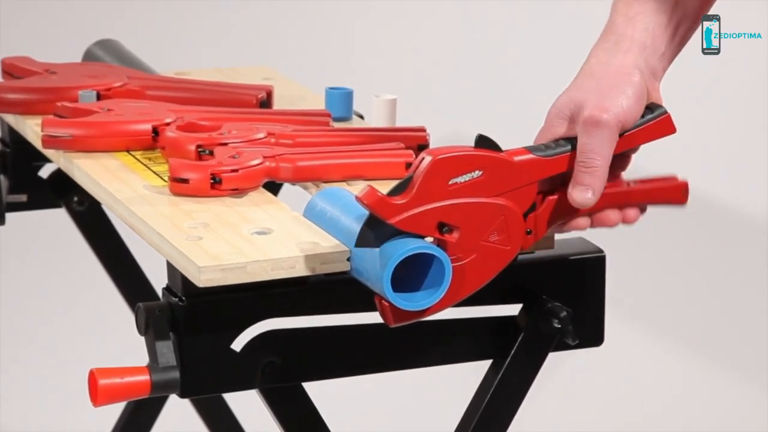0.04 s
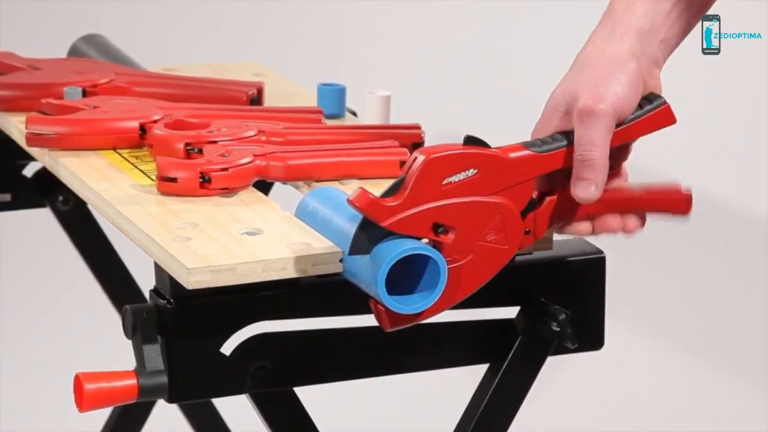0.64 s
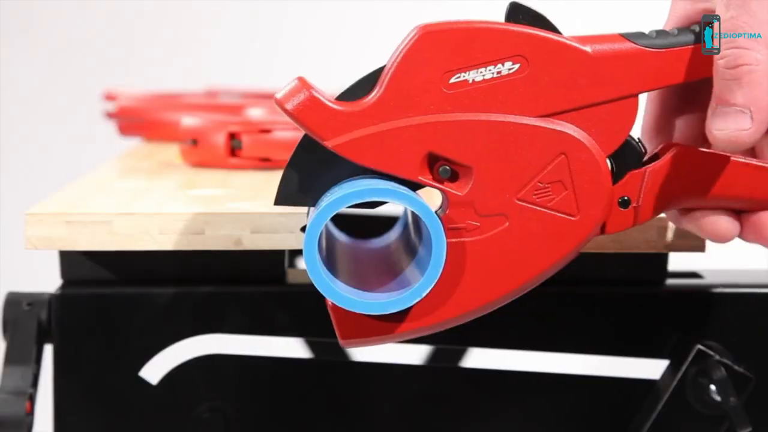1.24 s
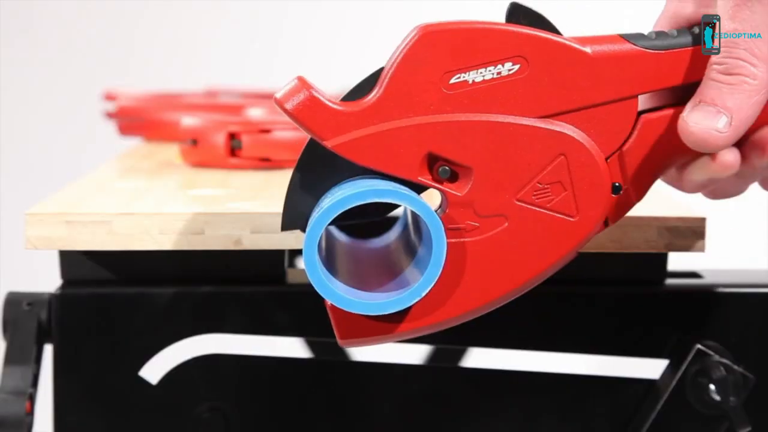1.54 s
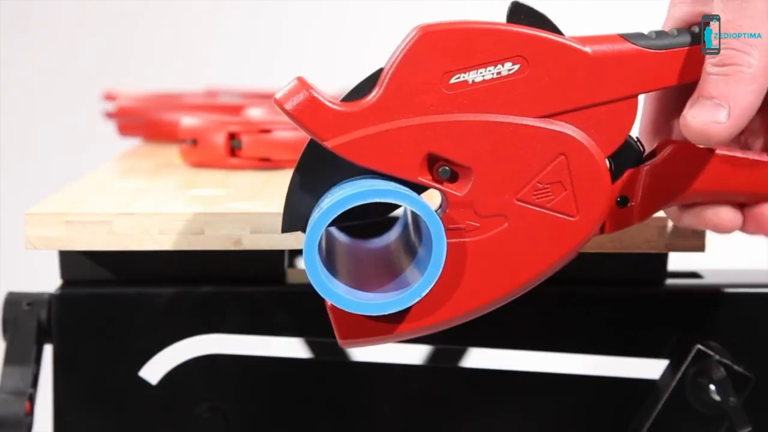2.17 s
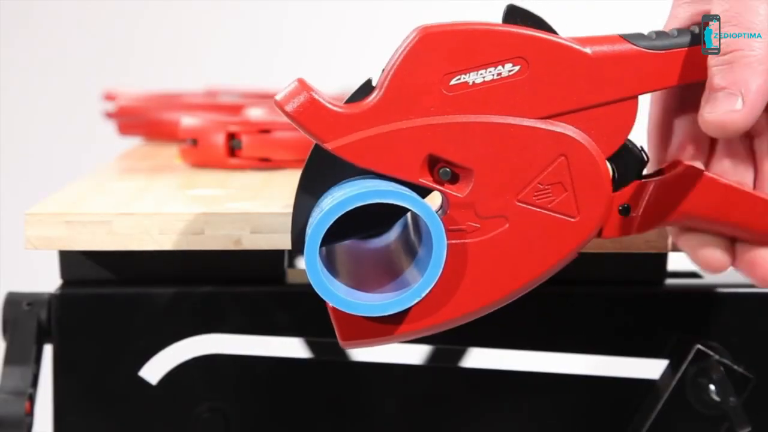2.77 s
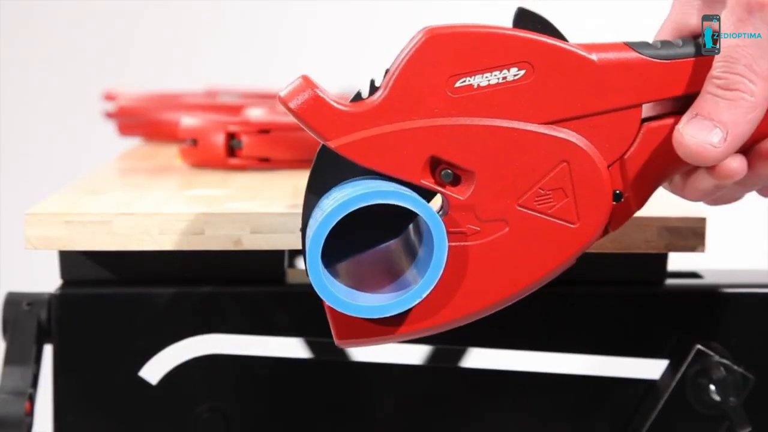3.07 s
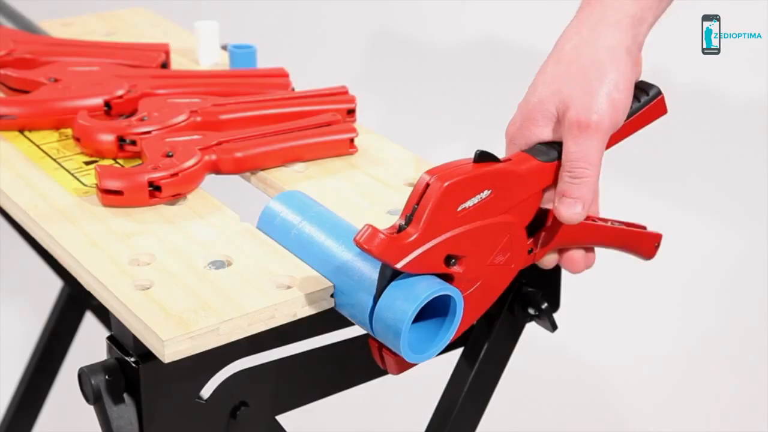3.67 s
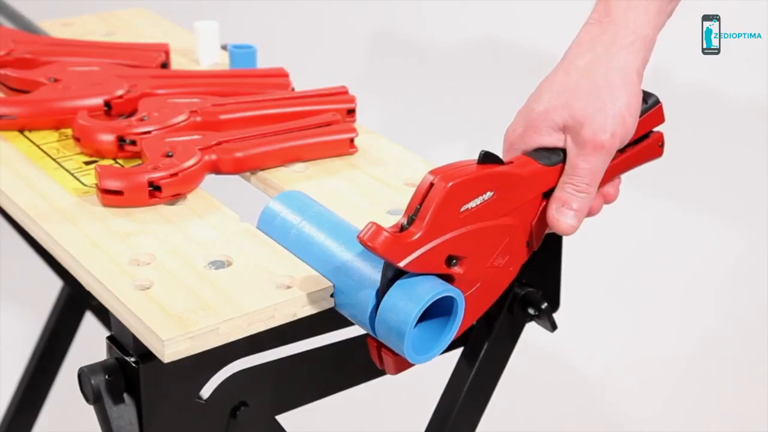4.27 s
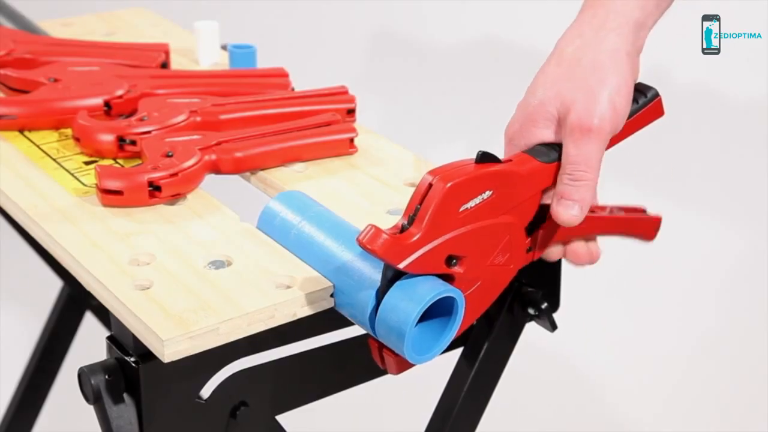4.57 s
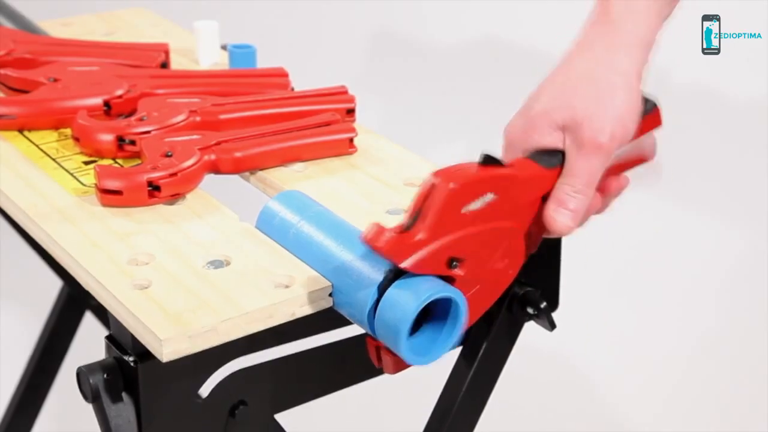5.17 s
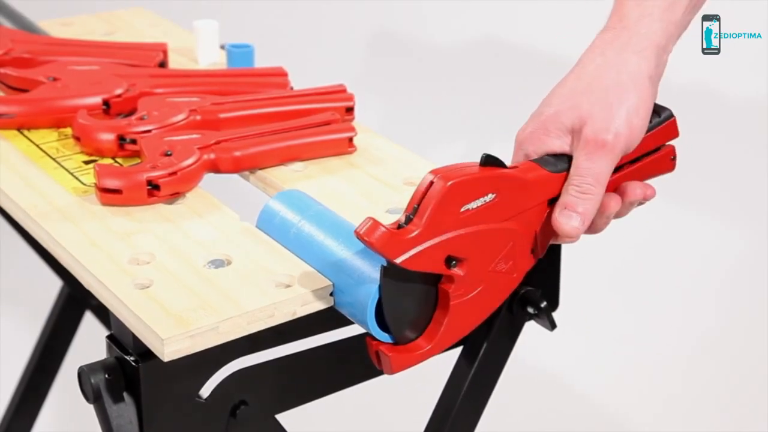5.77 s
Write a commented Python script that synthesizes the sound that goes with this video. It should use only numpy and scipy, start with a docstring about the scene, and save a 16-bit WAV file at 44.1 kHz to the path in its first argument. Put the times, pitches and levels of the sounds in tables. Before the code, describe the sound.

A hand ratchet cutter is pumped through a plastic pipe on a workbench. Squeezes end in sharp steel clicks, and about once a second the handle rattles open and clacks into the next tooth, with light ticks between. Finally the pipe snaps loudly, and the offcut thuds down and bounces once. The room is bare and ringing, and the loudest blows overload the close microphone.

```python
"""A workbench in a bare, ringing room: a ratchet cutter is pumped through a plastic pipe.
Each squeeze creaks and ends in sharp steel pawl clicks; the handle then rattles open and clacks
into the next tooth. The loose linkage ticks and the bench sways as the load shifts. At last the
pipe wall snaps, and the offcut thuds down and bounces. The loudest blows overload the microphone."""
import sys
import numpy as np
from scipy import signal
from scipy.fft import rfft, irfft, next_fast_len
from scipy.io import wavfile

SR = 44100
rng = np.random.default_rng(int(sys.argv[2]) if len(sys.argv) > 2 else 0)


def wrap_up_sound(samples):
    """Save the sound to the file named by the first command line argument, as 16-bit audio."""
    columns = np.atleast_2d(samples).T
    # keep every value between -1 and 1, then stretch to whole-number steps
    tamed = np.clip(columns, -1, 1)
    steps = np.round(tamed * 32767).astype(np.int16)
    wavfile.write(sys.argv[1], SR, steps)


N = 261072
T = np.arange(N) / SR
AGE = T[:SR // 2]

# pawl releases: start_s, ring_db, crack_re_ring_db, crack_hz, room_db, sing_hz
RELEASES = [(0.1791, -28, -8.5, 5100, -3.5, 3300), (0.2511, -16, 7.5, 11700, -1, 2950),
            (0.2931, -23.5, -17, 5000, -10, 2870), (1.530, -27, -1, 5560, -6.5, 3400),
            (1.6291, -19.5, 3.5, 11000, -3.5, 3300), (2.4202, -23, 2, 6760, -3, 1360),
            (2.4442, -20, -18.5, 6760, -14.5, 3200), (3.1861, -22, 4.5, 7300, -3, 1980),
            (3.2137, -17, -19, 6800, -19.5, 3250), (4.2874, -22.5, 9.5, 8700, -2, 4960)]
# handle openings: clack_s, ring_db, room_db, swing_s, rub_db, sway_db, sway_hz,
# housing_re_ring_db, sing_hz
STROKES = [(0.8169, -18, -1.5, .165, -50.5, -35, 78.6, -5, 2400),
           (1.9961, -9, -11, .085, -44.5, -39.5, 62, -5.5, 3450),
           (2.7874, -10, -12, 0.078, -43, -39.5, 58, -8, 3500),
           (3.7056, -15, -7.5, .135, -46.5, -36, 45, -5, 2070),
           (4.7295, -24, -7, 0.23, -57, -36.5, 55.3, 0.5, 1994)]
# last of the pipe wall giving way: start_s, level_db, t60_s
TEARS = [(5.2904, -35.5, 0.038), (5.2952, 2, 0.045), (5.302, -6, 0.026), (5.32, -9, 0.24)]
# blade and ratchet modes: pitch_hz, level_db, t60_s
STEEL_MODES = [(983, -6.5, 0.025), (1988, -6, 0.082), (3170, 1.5, 0.2), (3500, 2.5, 0.52), (4960, -2.5, .2),
               (6270, -7.5, .1), (8440, -7, 0.2), (9000, -8.5, .16), (11700, -25, 0.22)]
# housing knock: freq_hz, level_db
HOUSING_SPECTRUM = [(60, -3.5), (150, -7.5), (300, -3.5), (450, -5.5), (620, -8), (800, -1), (1000, 0.5),
                    (1700, 3.5), (2300, 5.5), (3200, 5), (4500, -7), (8000, -37.5)]

CATCH_CRACK_DB = -6.5  # re ring
RING_SCATTER = .025  # grip shifts the handle's pitch from blow to blow


def ratchet():
    """All blows of the mechanism as (near, far): direct sound and room send."""
    # close by, the clicks are hollow in the low mids, slightly forward near 900 Hz: freq_hz, gain_db
    direct_eq = [(150, -0.5), (450, -6.5), (900, 2.5), (2000, -0.5), (3500, -2)]
    near, far = np.sum([pawl(), catch(), teeth(), linkage()], axis=0)
    return colour(near, direct_eq), far


def pawl(ring_hz=3250):
    """The pawl lets go at the end of a squeeze."""
    near, far = np.zeros((2, N))
    for s, db, crack_db, crack_hz, room_db, sing_hz in RELEASES:
        hz = ring_hz * (1 + RING_SCATTER * rng.standard_normal())
        housing_db = -4 + 0.23 * crack_db
        add(near, s, undb(db) * click(housing_db, crack_db, hz, crack_hz, t60s=(0.015, 0.023, 0.025)))
        # the crack is aimed at the microphone, so the room gets less
        spread = radiated(housing_db, crack_db - 11.5, hz, crack_hz, width_hz=3100)
        add(far, s, undb(db + room_db) * (spread + undb(housing_db) * singing(sing_hz)))
    return near, far


def catch(ring_hz=3329, crack_hz=4500):
    """The opened handle clacks into the next tooth."""
    near, far = np.zeros((2, N))
    for s, db, room_db, *_, housing_db, sing_hz in STROKES:
        hz = ring_hz * (1 + RING_SCATTER * rng.standard_normal())
        clack = click(housing_db, CATCH_CRACK_DB, hz, crack_hz, t60s=(0.012, 0.016, 0.023))
        add(near, s, undb(db) * clack)
        spread = radiated(housing_db, CATCH_CRACK_DB - 5.5, hz, crack_hz, width_hz=1530)
        add(far, s, undb(db + room_db) * (spread + undb(housing_db) * singing(sing_hz)))
    return near, far


def teeth():
    """The pawl scrapes a tooth's edge, then drops; harder contact rings the steel more."""
    near, far = np.zeros((2, N))
    catches = [(s, db, CATCH_CRACK_DB) for s, db, *_ in STROKES]
    for s, db, crack_db, *_ in RELEASES + catches:
        add(near, s - .005, undb(db - 32) * crack(t60_s=0.097, hz=3700))
        add(near, s, undb(db + .5 * crack_db - 21) * modes(STEEL_MODES, spread_db=3))
    return near, far


def linkage(near_db=-10, room_db=-9, crack_hz=4600):
    """Loose links tick: soft ticks mostly knock the housing, hard ones also ring and crack."""
    # linkage ticks: start_s, level_db, hardness_db
    ticks = [(0.176, -30, 7.5), (0.652, -29.5, -10.5), (1.0064, -30, 7.5), (1.4362, -49.5, -18),
             (1.4737, -41, -7), (1.8802, -30, -2), (1.8894, -41, 4.5), (1.9301, -28.5, -1.5),
             (1.9689, -34.5, 0), (1.9844, -26, 0.5), (2.155, -31, -0.5), (2.1653, -38, 2),
             (2.679, -31, -1.5), (2.7138, -30, 3.5), (2.7634, -23, -1), (2.9309, -30, -3),
             (3.1086, -42.5, -6.5), (3.456, -33, -4), (3.4892, -44, -0.5), (3.5865, -37.5, 7),
             (3.8385, -24.5, -3.5), (4.5588, -27.5, -2.5), (4.5699, -31.5, 4), (4.6086, -33.5, -4),
             (4.8941, -27, 4), (5.553, -26, -5)]
    near, far = np.zeros((2, N))
    for s, db, hard_db in ticks:
        crack_db = -2 + 0.35 * hard_db
        tick = click(-hard_db, crack_db, ring_hz=3580, crack_hz=crack_hz, t60s=(0.0039, 0.03, 0.022))
        add(near, s, undb(db + hard_db + near_db) * tick)
        spread = radiated(-hard_db, crack_db - 8.5, ring_hz=3400, crack_hz=crack_hz, width_hz=1200)
        add(far, s, undb(db + hard_db + room_db) * spread)
    return near, far


def click(housing_db, crack_db, ring_hz, crack_hz, t60s):
    """Steel on steel: the handle's close mode pair, a housing knock and a crack."""
    ring_t60_s, housing_t60_s, crack_t60_s = t60s
    pair = np.sin(2 * np.pi * ring_hz * AGE) + 0.41 * np.sin(2 * np.pi * ring_hz * 1.09 * AGE)
    ring = blow(pair * fade(ring_t60_s) * (1 - fade(0.0021)))
    knock = undb(housing_db) * burst(housing_t60_s, HOUSING_SPECTRUM)
    return ring + knock + undb(crack_db) * crack(crack_t60_s, crack_hz)


def crack(t60_s, hz):
    """Bright contact noise with a peak at hz."""
    # steel contact: freq_hz, level_db
    spectrum = [(1500, -39), (3500, 2), (4600, 1.5), (6500, 3), (9000, -2), (12000, -1.5), (15000, -13.5)]
    noise = burst(t60_s, spectrum)
    return blow(noise + 2.2 * resonance(noise, hz, width_hz=810))


def radiated(housing_db, crack_db, ring_hz, crack_hz, width_hz):
    """A click summed over all directions: dips even out, steel resonances stand clear."""
    ring = blow(resonance(resonance(push(0), ring_hz, width_hz), ring_hz, width_hz))
    parts = [ring, undb(housing_db) * burst(0, HOUSING_SPECTRUM), undb(crack_db) * crack(0, crack_hz)]
    power = np.sum(np.abs(rfft(parts)) ** 2, axis=0)
    hz = np.fft.rfftfreq(len(AGE), 1 / SR)
    # grip and jaw angle shift and reweight the resonances on each blow
    centres_hz = np.array(STEEL_MODES)[:, 0] * (1 + .04 * rng.standard_normal(len(STEEL_MODES)))
    peaks = sum(3.2 * rng.exponential() / (1 + ((hz - f) / (55 + .003 * f)) ** 2) for f in centres_hz)
    level_db = 10 * np.log10(power * (1.006 + peaks))
    return colour(push(0), np.transpose([hz, level_db])[1:])


def singing(hz):
    """A brief jaw resonance that gives a blow's room tail its pitch."""
    return undb(-1.5) * blow(resonance(push(0), hz, width_hz=180))


def snap():
    """The pipe wall splits ahead of the blade and the jaws slam shut."""
    # splitting plastic, slamming jaws: freq_hz, level_db
    fracture = [(60, -5.5), (150, -9.5), (300, -12.5), (600, -14.5), (1000, -5.5), (2000, -1), (2800, 0.5),
                (4300, 0), (5500, -6.5), (9000, -10), (12000, -20), (15000, -20)]
    jaws = [(2200, -30.5), (3000, -4.0), (3550, 3.5), (4200, -6.0), (5200, -34.5)]
    near, far = np.zeros((2, N))
    for s, db, t60_s in TEARS:
        add(near, s, undb(db) * (burst(t60_s, fracture) + undb(-5) * burst(t60_s, jaws)))
    # the main tear fills the room
    hz = np.geomspace(60, 15000, 80)
    power = undb(along(fracture, hz)) ** 2 + undb(along(jaws, hz) + 8.5) ** 2
    main_s = max(TEARS, key=lambda tear: tear[1])[0]
    add(far, main_s, undb(5.5) * burst(0, np.transpose([hz, 10 * np.log10(power)])))
    return near, far


def offcut():
    """A soft thud, then a harder bounce on the rim; shorter contact reaches higher."""
    # impacts: start_s, level_db, corner_hz, t60_s, room_db
    landings = [(5.618, -4, 326, 0.03, -4.5), (5.905, -1.5, 1110, 0.026, -2)]
    # modes of the struck surface: pitch_hz, level_db, t60_s
    boom = [(120.4, -1, 0.18), (134, 1.5, 0.28), (183, 1, 0.48), (264.7, 7, 0.44), (430, -1, .3),
            (480.5, -14, 0.29), (617, -12, 0.26)]
    near, far = np.zeros((2, N))
    for s, db, hz, t60_s, room_db in landings:
        contact = [(hz / 8, -26), (hz / 2.6, 0), (hz, 0), (hz * 1.27, -13), (hz * 5, -35), (hz * 30, -50)]
        add(near, s, undb(db) * (undb(-3) * burst(t60_s, contact) + undb(1.5) * modes(boom)))
        add(far, s, undb(db + room_db) * burst(0, contact))
    return near, far


def handling(take_up_s, rub_share=0.83, creak_s=.22):
    """The handle rubs and rattles open, then rubs as it closes; the loaded pipe creaks."""
    # hand and pivot rub, loose rattle, pipe creak: freq_hz, level_db
    rub_eq = [(60, 17.5), (150, 9.5), (400, 3), (1000, 2.5), (2200, -5), (3500, -2.5), (5000, -35),
              (9000, -37), (15000, -34.5)]
    rattle_eq = [(500, -10.5), (2200, 1), (3400, -2), (5000, -14), (15000, -28)]
    creak_eq = [(500, -10.5), (1300, 4), (2300, -5.5), (3400, -0.5), (5000, -17.5), (15000, -35)]
    swings = [(s - swing_s, s - swing_s * (1 - rub_share), db) for s, _, _, swing_s, db, *_ in STROKES]
    take_ups = [(s + take_up_s, s + take_up_s + 0.074, -57) for s, *_ in STROKES]
    loads = [(s - creak_s, s, -65) for s, *_ in RELEASES + TEARS[:1]]
    rattle = undb(-4.5) * slips(swings, rattle_eq, rate_hz=90)
    creak = slips(loads, creak_eq, rate_hz=30)
    chatter = push(t60_s=.012)
    loose = signal.fftconvolve(rattle + creak, chatter / np.linalg.norm(chatter))[:N]
    return slips(swings + take_ups, rub_eq, rate_hz=900) + loose


def crackle():
    """The plastic crackles as it yields."""
    # yielding spells: start_s, end_s, level_db
    spans = [(0.262, 0.32, -53), (1.668, 1.72, -46), (5.32, 5.42, -51)]
    return slips(spans, [(2000, -29.5), (7000, -6.5), (11000, 0.5), (15000, -4.5)], rate_hz=1000)


def slips(spans, spectrum, rate_hz):
    """Tiny uneven slips within spans of start_s, end_s, level_db."""
    effort = sum(undb(db) * np.interp(T, [start - .01, start + .01, end - .01, end + .01], [0, 1, 1, 0])
                 for start, end, db in spans)
    sizes = rng.standard_normal(N) * undb(3 * np.minimum(rng.exponential(size=N), 3))
    slipping = rng.random(N) < rate_hz / SR
    return effort * unit(colour(slipping * sizes, spectrum))


def bench(take_up_s, lag_s=0.056):
    """The bench sways as the load shifts: first bite, each opening and closing, the snap."""
    out = np.zeros(N)
    add(out, RELEASES[1][0], undb(-37.5) * sway(sway_hz=85))
    for s, _, _, swing_s, _, db, hz, *_ in STROKES:
        add(out, s - swing_s + lag_s, undb(db + 0.5) * sway(hz))
        add(out, s + take_up_s + lag_s, undb(db - 3.5) * sway(hz))
    add(out, TEARS[0][0], undb(-29.5) * sway(sway_hz=60))
    return out


def sway(sway_hz, db_per_octave=-20):
    """Frame modes near sway_hz build up, waver and die."""
    # bench frame modes: pitch_hz, level_db, t60_s
    frame = [(45, -1.5, 0.85), (55, -0.5, 1.7), (77, 6, 0.35), (100, 1.5, .7)]
    out, t = 0, T[:2 * SR]
    for hz, db, t60_s in frame:
        waver = np.cumsum(rng.standard_normal(len(t))) * np.sqrt(12 / SR)
        gain = undb(db + db_per_octave * abs(np.log2(hz / sway_hz)))
        envelope = fade(t60_s, t) * (1 - fade(0.18, t))
        out = out + gain * envelope * np.sin(2 * np.pi * hz * t + waver)
    return out


def room(x, wet_db):
    """Bench top and near walls answer at once; the diffuse tail lasts longest in the bass."""
    # reverberation: freq_hz, t60_s
    decay = [(100, 0.89), (300, 0.81), (800, 0.56), (2000, 0.48), (3500, 0.53), (5500, 0.42), (9000, 0.34),
             (14000, 0.48)]
    centres_hz, t60s = np.transpose(decay)
    t = T[:SR]
    hz = np.fft.rfftfreq(SR, 1 / SR)
    noise = rfft(rng.standard_normal(SR))
    bands = [irfft(noise * along(list(zip(centres_hz, share)), hz)) for share in np.eye(len(t60s))]
    tail = sum(band * fade(t60_s, t) for band, t60_s in zip(bands, t60s))
    tail = tail * (1 + .5 * fade(0.24, t)) * (1 - fade(0.023, t))
    tail = colour(tail, [(100, -1), (500, 7), (1500, 1.5), (3500, -3), (7000, -0.5), (14000, -4.5)])
    return undb(wet_db) * signal.fftconvolve(x, tail / np.linalg.norm(tail))[:N]


def air():
    """Steady low room noise."""
    # room tone: freq_hz, level_db
    spectrum = [(18, -32), (30, -8), (77, 0), (164, -15.5), (307, -18), (492, -27.5), (2300, -34.5),
                (3400, -39.5), (4540, -42), (15500, -50)]
    return undb(-55) * unit(colour(rng.standard_normal(N), spectrum))


def burst(t60_s, spectrum):
    """Short-lived modes, too dense to tell apart."""
    return blow(colour(push(t60_s), spectrum))


def modes(table, spread_db=0):
    """Damped sines; a blow excites them unevenly, by spread_db."""
    return blow(sum(undb(db + spread_db * rng.standard_normal()) * fade(t60_s)
                    * np.sin(2 * np.pi * hz * AGE) for hz, db, t60_s in table))


def push(t60_s):
    """Decaying noisy force; one clean impulse at t60_s 0."""
    if t60_s == 0:
        return signal.unit_impulse(len(AGE))
    return rng.standard_normal(len(AGE)) * fade(t60_s)


def resonance(x, hz, width_hz):
    """Two-pole band-pass."""
    return signal.lfilter(*signal.iirpeak(hz, hz / width_hz, fs=SR), x)


def colour(x, points):
    """Minimum-phase filter through points of freq_hz, gain_db."""
    size = next_fast_len(2 * len(x), real=True)
    size += size % 2
    gain = undb(along(points, np.fft.rfftfreq(size, 1 / SR)))
    cepstrum = irfft(np.log(gain))
    cepstrum[1:size // 2] *= 2
    cepstrum[size // 2 + 1:] = 0
    return irfft(rfft(x, size) * np.exp(rfft(cepstrum)))[:len(x)]


def along(points, hz):
    """Interpolate on a log-frequency axis."""
    freq_hz, value = np.transpose(points)
    return np.interp(np.log(np.maximum(hz, 1)), np.log(freq_hz), value)


def fade(t60_s, t=AGE):
    return np.exp(-np.log(1000) * t / t60_s)


def undb(db):
    return 10 ** (np.asarray(db) / 20)


def unit(x):
    """Scale to rms 1."""
    return x / np.sqrt(np.mean(x ** 2))


def blow(x):
    """Scale to the energy of 4 ms at rms 1."""
    return x / np.sqrt(np.sum(x ** 2) / (.004 * SR))


def add(track, start_s, sound):
    i = int(np.clip(start_s * SR, 0, N - 1))
    track[i:i + len(sound)] += sound[:N - i]


def scene():
    """Cutter, offcut and bench in one room."""
    take_up_s = .16  # from each clack until the closing handle takes the load
    near, far = np.sum([ratchet(), snap(), offcut()], axis=0)
    rub = handling(take_up_s)
    direct = near + rub + crackle() + air()
    reverb = room(far + undb(-1.5) * rub, wet_db=-4.5)
    return (direct + reverb + bench(take_up_s))[None]


def record(dry, low_cut_hz=25, top_hz=15650):
    """The loudest peaks are flattened; the ceiling and the hiss step twice, at 1.2 s and 3.4 s."""
    # ceiling and hiss steps: start_s, ceiling_change_db, hiss_db
    spells = [(0, 0, -59), (1.201, -3, -98.5), (3.4, -1.5, -76.5)]
    starts_s, ceiling_change_db, hiss_db = np.transpose(spells)
    step = np.searchsorted(starts_s[1:], T)
    ceiling = 0.31 * undb(ceiling_change_db[step])
    clipped = dry / (1 + (dry / ceiling) ** 6) ** (1 / 6)
    hiss_eq = [(200, 4.5), (3500, 1.5), (7000, -3.0), (15000, -1.5)]
    hiss = undb(hiss_db[step]) * unit(colour(rng.standard_normal(N), hiss_eq))
    highpass = signal.butter(4, low_cut_hz, "high", fs=SR, output="sos")
    lowpass = signal.ellip(8, .2, 80, top_hz, fs=SR, output="sos")
    return signal.sosfilt(lowpass, signal.sosfilt(highpass, clipped + hiss))


dry = scene()
out = record(dry)
wrap_up_sound(out)
```